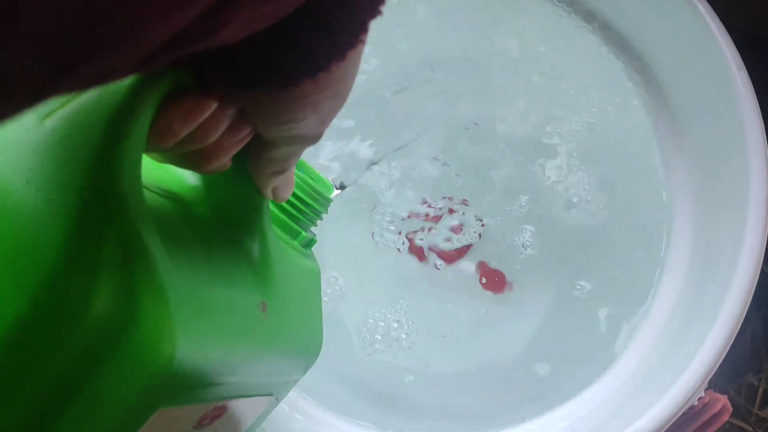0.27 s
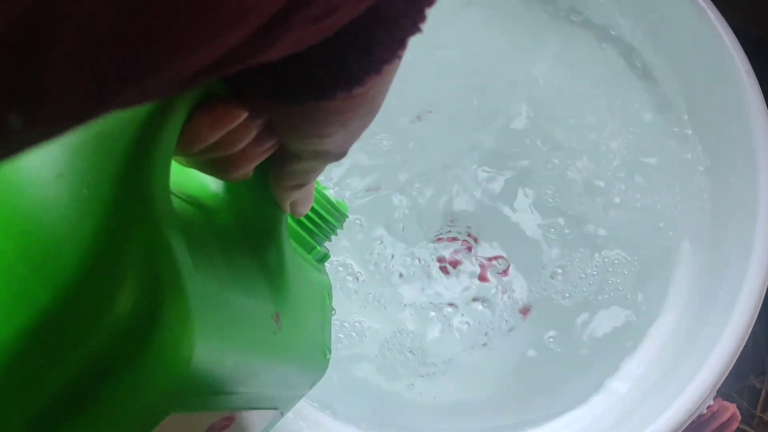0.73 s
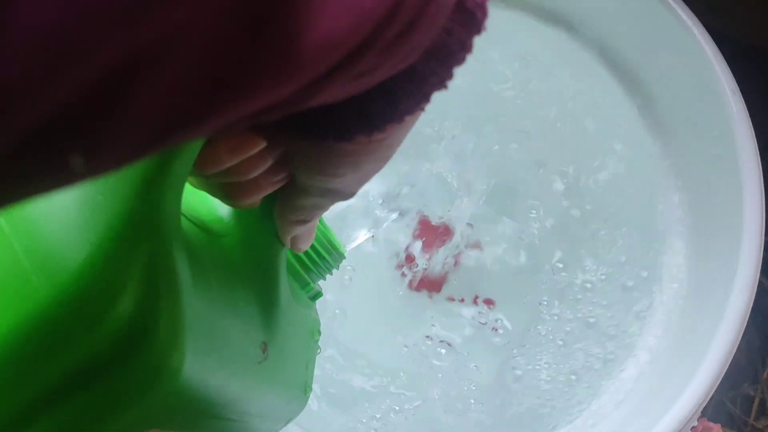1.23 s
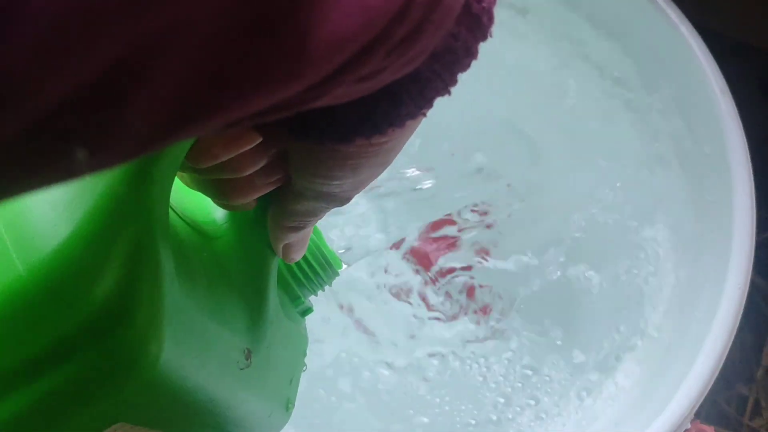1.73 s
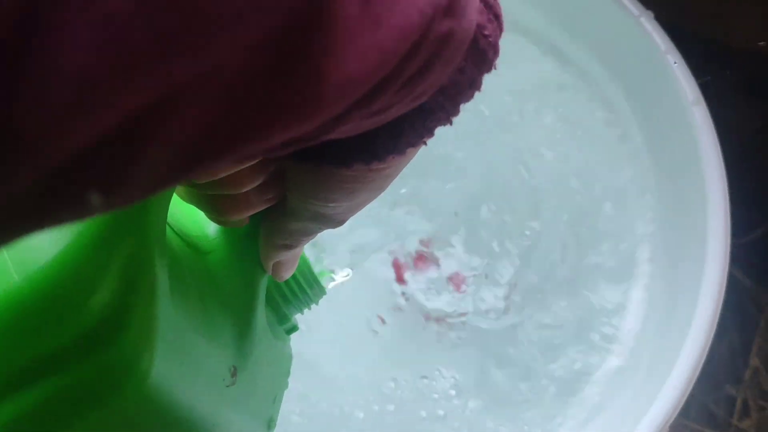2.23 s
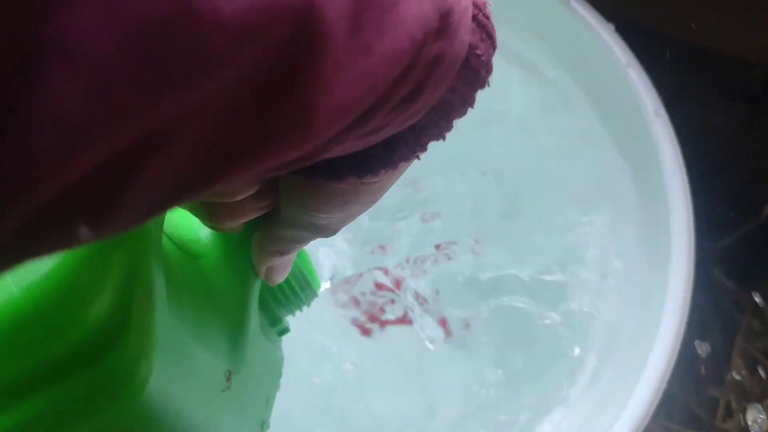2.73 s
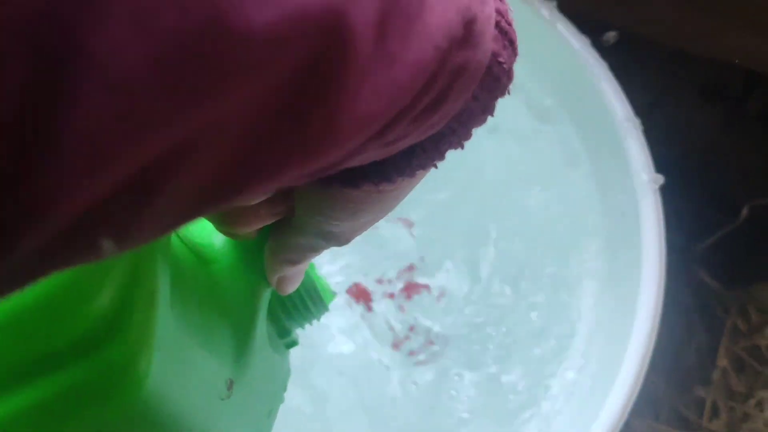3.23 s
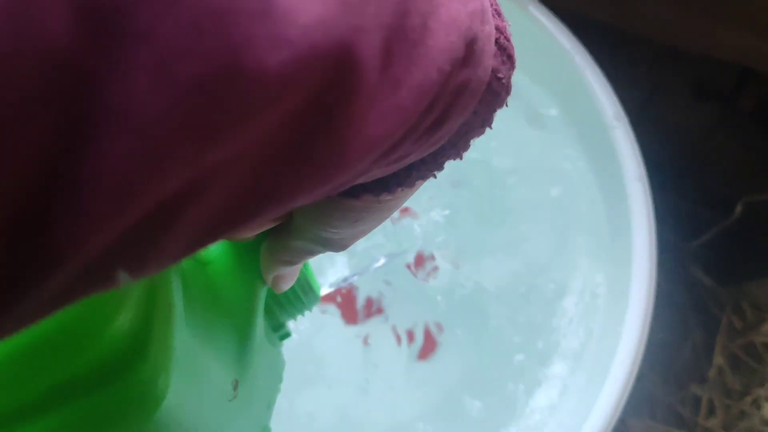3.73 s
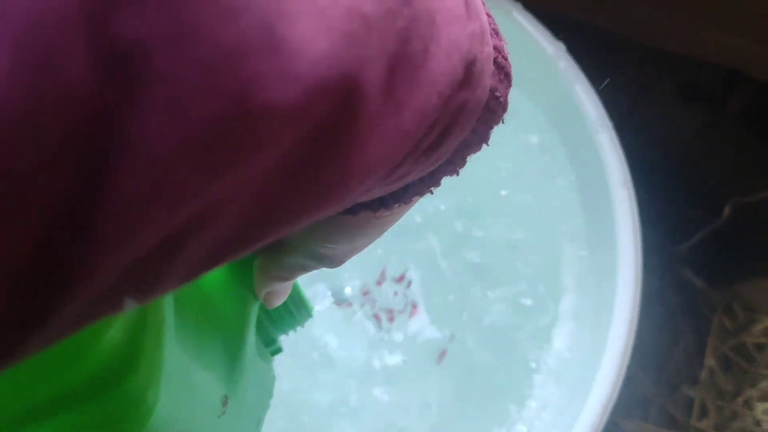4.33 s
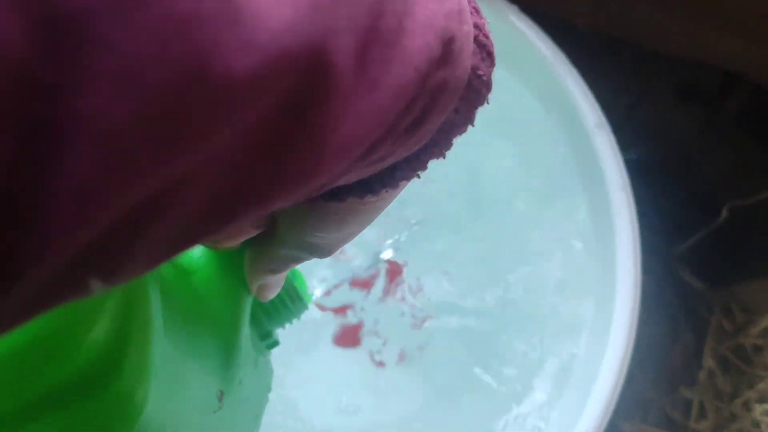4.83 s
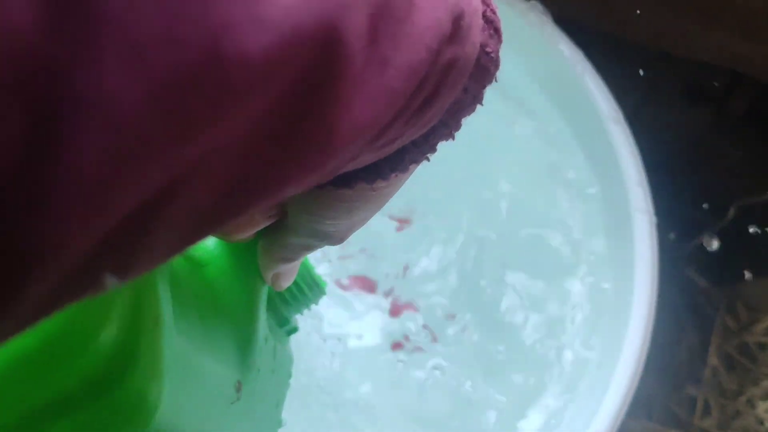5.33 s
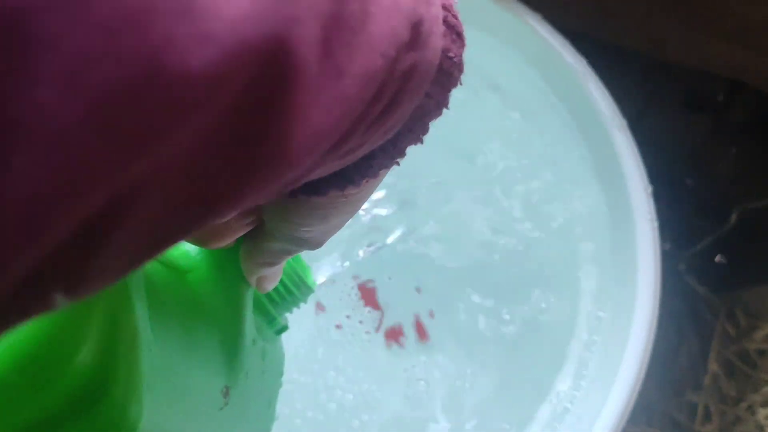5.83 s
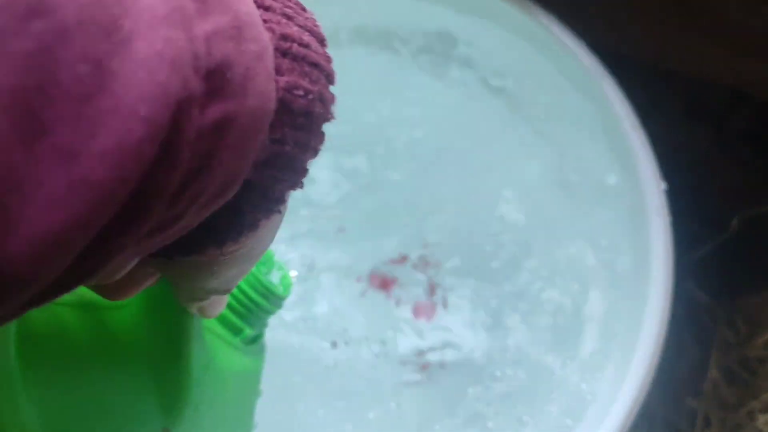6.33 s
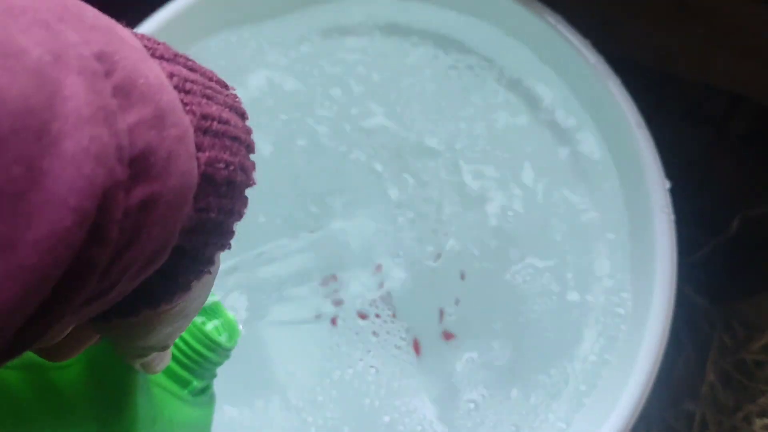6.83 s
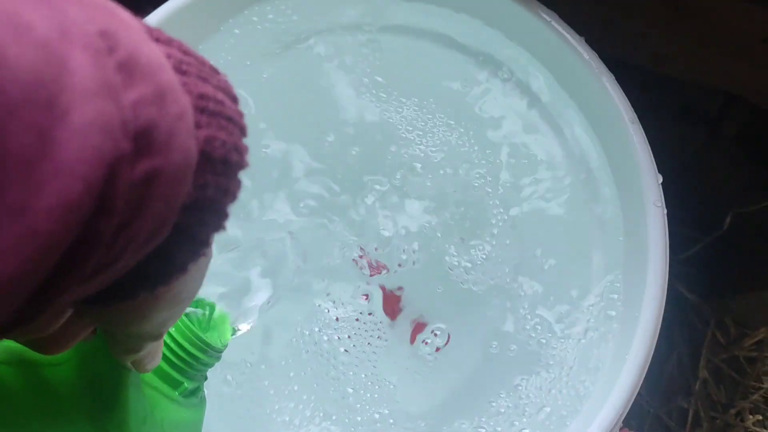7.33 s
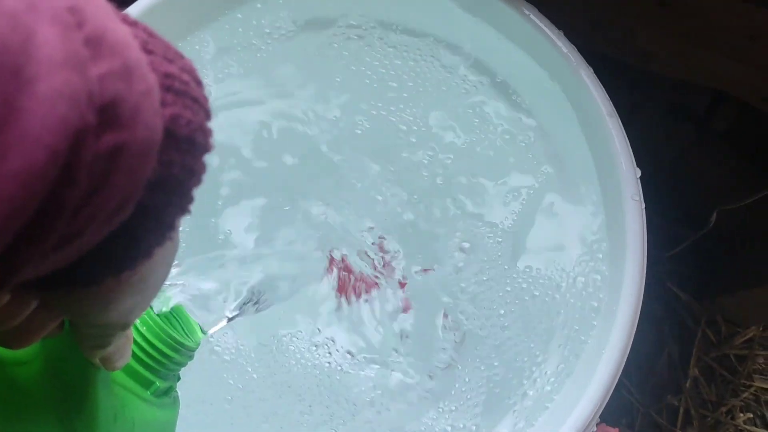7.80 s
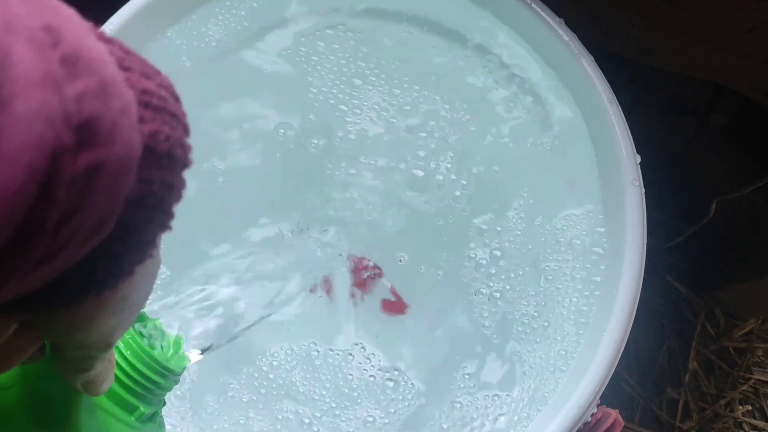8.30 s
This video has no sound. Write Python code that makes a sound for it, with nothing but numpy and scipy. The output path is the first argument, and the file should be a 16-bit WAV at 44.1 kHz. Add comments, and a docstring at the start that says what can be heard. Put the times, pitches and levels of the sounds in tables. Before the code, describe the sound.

Water glugs out of a hollow plastic jug in uneven slugs, splashing and bubbling into a nearly full plastic tub, close by outdoors.

```python
"""Water pours from a plastic jug into a wide, nearly full plastic tub, outdoors and close by.
From the start air gulps back about three times a second (sinking damped sines), so water lands in slugs:
noise bursts slap, clusters of short sines bubble, ringing ticks spray. From 2 s single bubbles plop.
From 5.9 s soft low thuds join in, from 6.5 s a burble of ringing pockets; the stream thins, the gulps
die out by about 7.3 s and plops remain. A faint filtered-noise rumble of open air runs throughout."""
import sys
import numpy as np
from scipy import signal
from scipy.fft import rfft, irfft
from scipy.io import wavfile
from scipy.ndimage import uniform_filter1d

SR = 44100
rng = np.random.default_rng(int(sys.argv[2]) if len(sys.argv) > 2 else 0)


def dump(signal):
    """Clip the signal to [-1, 1] and save it as 16-bit WAV at the path in sys.argv[1]."""
    limited = np.clip(np.atleast_2d(signal).T, -1, 1)
    pcm = np.round(limited * 32767).astype(np.int16)
    wavfile.write(sys.argv[1], SR, pcm)


N = 377496
TIME = np.arange(N) / SR

# Colour of the open air. Each row: frequency in Hz, relative density in dB per Hz.
AIR_COLOUR = [(20, 12.5), (60, 4.5), (400, -12.5), (8000, -22)]
# Soft low thuds as air slips into the jug; the stream chokes too. Each entry: time in seconds.
THUDS_S = [5.935, 6.408, 6.642, 6.855, 7.079, 7.311, 7.513, 7.757, 8.202, 8.368]
# Resonances of the jug's air and walls. Each row: frequency in Hz, level in dB, T60 in seconds.
JUG_MODES = [(221.9, -53, 0.19), (413, -53, 0.11), (588, -56.5, 0.33)]
# Gulps of air breaking into the jug. Each row: start in seconds, pitch in Hz, relative level in dB.
GULPS = [(0.05, 258, -21), (0.135, 300, -39), (0.196, 368, -32), (0.431, 252, -26), (0.552, 261, -29),
         (0.846, 360, -22.5), (0.921, 453, -25.5), (1.165, 346, -25.5), (1.221, 287, -27),
         (1.521, 246, -19), (1.637, 500, -20.5), (1.876, 267, -17), (1.929, 520, -26), (1.983, 180, -41),
         (2.227, 240, -28.5), (2.274, 397, -26), (2.34, 426, -29), (2.577, 270, -31), (2.678, 470, -24.5),
         (2.886, 280, -18.5), (3.024, 302, -31.5), (3.284, 316, -25.5), (3.366, 350, -26.5),
         (3.624, 440, -28), (3.711, 230, -36), (3.93, 290, -26.5), (4.631, 362, -31), (4.797, 330, -27),
         (5.511, 425, -16), (5.72, 293, -28.5), (6.273, 413, -25.5), (7.305, 248, -37)]
# Hums of the air in the jug. Each row: start in seconds, relative level in dB, T60 in seconds.
HUMS_IN_JUG = [(0.066, -18, 0.049), (0.452, -20, 0.041), (0.944, -30, 0.27), (1.54, -16.5, 0.036),
               (1.896, -16.5, 0.049), (2.242, -25, 0.051), (2.902, -28.5, 0.053), (3.384, -33, 0.11),
               (4.077, -31, 0.077), (4.82, -25, 0.064), (5.136, -41.5, 0.1)]
# Single large bubbles in the tub. Each row: start in seconds, pitch in Hz, relative level in dB.
LARGE_BUBBLES = [(1.95, 1040, -29.5), (2.282, 1260, -32), (2.849, 1044, -30.5), (3.182, 990, -31),
                 (3.612, 635, -27.5), (4.117, 2040, -33), (4.794, 910, -25), (5.613, 1347, -32),
                 (6.633, 540, -36), (6.646, 1170, -33.5), (6.69, 541, -31.5), (6.713, 1800, -31.5),
                 (6.803, 636, -35.5), (7.012, 683, -39), (7.155, 399, -34), (7.408, 585, -41.5),
                 (7.628, 623, -38.5), (7.815, 1080, -37.5), (8.085, 470, -33), (8.25, 690, -34.5)]
# Single fast drops snapping on the surface. Each row: start in seconds, relative level in dB.
FAST_DROPS = [(0.088, -21), (0.4355, -18.5), (3.2385, -19), (4.115, -25.5), (4.3, -23), (5.0695, -23.5),
              (5.462, -24.5), (6.012, -25.5), (6.812, -27.5), (7.1525, -20.5), (7.5605, -20)]
# Slugs hitting the surface. Each row: time in seconds, crack and body, both as relative level in dB.
SLUGS = [(0.3192, -26, -38), (0.432, -18, -19.5), (0.7635, -15, -19.5), (0.819, -26, -51),
         (1.169, -22, -37), (1.2848, -26, -29), (1.486, -16, -25.5), (1.5215, -24, -19),
         (1.877, -18.5, -32.5), (2.2278, -17.5, -26), (2.5302, -19.5, -23), (2.5731, -17.5, -22),
         (2.8501, -18, -26.5), (2.888, -16.5, -52), (3.1123, -52, -27.5), (3.237, -18.5, -24.5),
         (3.4503, -28, -24.5), (3.9195, -18, -26), (4.353, -28, -27), (4.574, -48, -28.5),
         (4.657, -26, -24.5), (5.0003, -21.5, -23), (5.2355, -24, -31.5), (5.7194, -21, -32.5),
         (6.0524, -17.5, -29), (6.27, -23.5, -35.5), (6.3872, -16, -61), (7.303, -34, -37.5),
         (8.182, -33.5, -29)]
# Colour of slap bodies. Each row: frequency in Hz, relative density in dB per Hz.
BODY_COLOUR = [(250, -2), (600, 11), (1500, 10.5), (2200, 16), (3000, 12), (5000, -13.5)]
# Colour of spray, cracks and snaps. Each row: frequency in Hz, relative density in dB per Hz.
SPRAY_COLOUR = [(1800, -15.5), (3000, -6.5), (4300, 0.5), (8000, 4), (10000, -2.5), (12000, -6),
                (14500, -3.5)]
# Colour of the bubbling. Each row: frequency in Hz, relative density in dB per Hz.
BUBBLING_COLOUR = [(350, -3.5), (700, -7), (1040, -1.5), (1450, -6), (2100, 0.5), (3000, -2.5), (4500, -8)]
# Unbroken part of the stream, thinning as the jug empties. Each row: time in seconds, level in dB.
STREAM_LEVEL = [(0.0, -39.5), (2.0, -36.5), (4.5, -37), (6.3, -38.5), (7.3, -44), (8.56, -42.5)]
# Chokes while air forces its way into the neck. Each entry: time in seconds.
CHOKES_S = [0.375, 0.659, 0.745, 1.12, 1.439, 2.135, 2.475, 2.815, 3.165, 3.565, 3.8, 4.235, 4.56, 4.945,
            5.57, 5.995, 6.24, 7.95]
# Gushes that tumble out and splash. Each row: start in seconds, hold in seconds, level in dB.
GUSH_EVENTS = [(0.03, 0.041, -34.5), (0.127, 0.064, -31), (0.388, 0.048, -32.5), (0.531, 0.03, -27.5),
               (0.802, 0.027, -22), (0.84, 0.17, -37.5), (1.153, 0.057, -29), (1.515, 0.038, -30.5),
               (1.631, 0.021, -33), (1.899, 0.083, -35.5), (2.141, 0.068, -32.5), (2.667, 0.0063, -26),
               (2.751, 0.0057, -28.5), (3.571, 0.049, -31), (3.683, 0.022, -29), (3.81, 0.025, -35.5),
               (3.977, 0.0081, -33), (4.025, 0.025, -31.5), (4.254, 0.025, -28), (4.999, 0.039, -32),
               (5.107, 0.03, -37.5), (5.323, 0.089, -36.5), (5.709, 0.089, -37.5), (6.364, 0.16, -38),
               (6.923, 0.087, -38), (7.135, 0.04, -38.5), (7.61, 0.041, -35), (7.79, 0.049, -30.5),
               (8.01, 0.097, -38.5), (8.282, 0.058, -37)]

CUTOFF_HZ, SPOT_COUNT = 14200, 8
TUB_T60_S, TUB_ECHO_DB = 0.079, 5
GULP_SUSTAIN = 1.81  # decay exponent: 1 rings freely, more holds before dying, as the flow feeds it
HUM_HZ, HUM_SAG_PER_S = 231.6, 1.5  # sag as a share of the starting pitch
GURGLE_DB, GURGLE_T60_S = -25, 0.33
NECK_OPEN_S = 6.47  # from here the neck is partly open and burbles
PLOP_S, PLOP_TAIL_T60_S, PLOP_TAIL_DB, PLOP_RISE_SHARE = 0.013, 0.079, -1.5, 0.18
SLAP_ATTACK_S, SLAP_T60_S, SPATTER_T60_S, SPATTER_DB = 0.0027, 0.013, 0.31, -27.5
SURFACE_ECHO_DB = -3  # added to the tub's echo for slaps and snaps
BUBBLE_RISE_SHARE = .13
CHOKE_DEPTH_DB, CHOKE_S, RECOVER_S = 5.5, 0.053, 0.016
GUSH_ATTACK_S, GUSH_T60_S = 0.0066, 0.085


def from_db(db):
    """Decibels to amplitude."""
    return 10 ** (np.asarray(db) / 20)


def rms_one(x):
    """Scale to an RMS of 1."""
    return x / np.sqrt(np.mean(x ** 2) + 1e-20)


def add(out, s, sound):
    """Mix a short sound in at time s."""
    i = int(np.clip(s * SR, 0, N - 1))
    out[i:i + len(sound)] += sound[:N - i]


def cut(x, hz, kind):
    """Second-order low- or high-pass."""
    return signal.sosfilt(signal.butter(2, hz, kind, fs=SR, output="sos"), x + 1e-18)


def colour(x, spectrum, size=1024):
    """Minimum-phase filter of unit power; beyond the listed points it falls 12 dB an octave."""
    log_hz, db = np.log2(np.array(spectrum)[:, 0]), np.array(spectrum)[:, 1]
    grid = np.log2(np.maximum(np.arange(size + 1), .5) * SR / (2 * size))
    octaves_outside = np.abs(grid - np.clip(grid, log_hz[0], log_hz[-1]))
    gain = rms_one(from_db(np.interp(grid, log_hz, db) - 12 * octaves_outside))
    # folding the cepstrum to positive times makes the response causal
    cepstrum = irfft(np.log(gain))[:size] * np.where(np.arange(size) > 0, 2, 1)
    response = irfft(np.exp(rfft(cepstrum, 2 * size)))
    return signal.oaconvolve(x, response[None], axes=1)[:, :N]


def steady(x, window_s):
    """Even out the slow level, leaving the grain."""
    power = uniform_filter1d(np.mean(x ** 2, axis=0), int(window_s * SR) + 1)
    smooth_power = uniform_filter1d(np.abs(power), int(window_s * SR / 2) + 1)
    return x / np.sqrt(smooth_power.clip(1e-12))


def ring(x, hz, t60_s):
    """A resonance: a unit click leaves a damped cosine of height 1."""
    r = from_db(-60 / (t60_s * SR))
    w = 2 * np.pi * min(hz, .45 * SR) / SR
    return signal.lfilter([1, -r * np.cos(w)], [1, -2 * r * np.cos(w), r * r], x + 1e-18)


def bubble(hz, t60_s, glide_share, attack_per_cycle=5.6, sustain=1):
    """A damped sine whose pitch shifts by glide_share while it dies."""
    t = TIME[:int(t60_s * SR) + 2]
    swell = 1 - np.exp(-attack_per_cycle * hz * t)
    decay = from_db(-60 * (t / t60_s) ** sustain)
    return swell * decay * np.sin(2 * np.pi * hz * t * (1 + glide_share * t / (2 * t60_s)))


def tub(spots, spread_db=6.5, lag_s=0.00024, scatter_hz=520, echo_db=0, samples=9000):
    """Each surface spot reaches two microphones by its own path and its own echoes off the wall."""
    t, out = TIME[:samples], 0
    for place, sound in zip(np.linspace(-1, 1, len(spots)), spots):
        echoes = rng.standard_normal((2, samples)) * from_db(-60 * t / TUB_T60_S) * (t > .001)
        echoes = cut(rms_one(echoes) / np.sqrt(samples), scatter_hz, "high")
        paths = from_db(TUB_ECHO_DB + echo_db) * echoes
        lag = int(abs(place) * lag_s * SR)
        direct = from_db(spread_db * place * np.array([.5, -.5]))
        paths[[0, 1], [lag * (place < 0), lag * (place > 0)]] += direct
        out = out + signal.oaconvolve(sound[None], paths, axes=1)[:, :N]
    return out


def outdoor_air(level_db=-56.0, apart_db=-3.5):
    """A faint noise rumble, mostly alike at both microphones."""
    mid, side = rng.standard_normal((2, N))
    both = mid + from_db(apart_db) * side * [[1], [-1]]
    return from_db(level_db) * colour(both, AIR_COLOUR, size=4096)


def thuds(level_db=-36.5, low_hz=50, high_hz=230, spread_s=0.05, cycles=4, pockets=9):
    """Each dull thud is a quick tumble of large air pockets in the jug, each only a few swings long."""
    out = np.zeros(N)
    for s in THUDS_S:
        for wait, pitch in rng.random((pockets, 2)):
            hz = low_hz * (high_hz / low_hz) ** pitch
            pocket = bubble(hz, cycles / hz, glide_share=0)
            add(out, s - .01 + spread_s * wait, from_db(level_db) * pocket)
    return out


def jug(x):
    """The hollow jug rings on after whatever stirs it."""
    return x + sum(from_db(db) * ring(x, hz, t60_s) for hz, db, t60_s in JUG_MODES)


def churn(per_s, cycles, low_hz, high_hz, glide_share):
    """Large air pockets tumble through the water, each ringing briefly at its own pitch; RMS 1."""
    out = np.zeros(N)
    for when, pitch, size in rng.random((int(per_s * N / SR), 3)):
        hz = low_hz * (high_hz / low_hz) ** pitch
        add(out, when * N / SR, size * bubble(hz, cycles / hz, glide_share))
    return rms_one(out)


def stirring():
    """Strength of the gurgle: each gulp stirs the jug's water, a louder one somewhat more; it settles."""
    power = np.zeros(N)
    for s, _, db in GULPS:
        add(power, s, from_db(GURGLE_DB + db / 2 - 60 * TIME[:SR] / GURGLE_T60_S) ** 2)
    return np.sqrt(power)


def gulps(gulp_cycles=9, glide_share=-0.3):
    """A gulp swings a few times, sinking in pitch; the jug's air hums and sags as it dies."""
    out = np.zeros(N)
    for s, hz, db in GULPS:
        add(out, s, from_db(db) * bubble(hz, gulp_cycles / hz, glide_share, sustain=GULP_SUSTAIN))
    for s, db, t60_s in HUMS_IN_JUG:
        hum = bubble(HUM_HZ, t60_s, -HUM_SAG_PER_S * t60_s, attack_per_cycle=0.51, sustain=GULP_SUSTAIN)
        add(out, s, from_db(db) * hum)
    return out


def plops(level_db=0.0, attack_per_cycle=1.6, echo_db=-3, wobble_depth=0.43, samples=4000):
    """Large bubbles pinch off under the jug's mouth; each note wobbles in level and swoops up as it rises."""
    spots, t = np.zeros((SPOT_COUNT, N)), TIME[:samples]
    shape = from_db(-60 * (t / PLOP_S) ** 3) + from_db(PLOP_TAIL_DB - 60 * t / PLOP_TAIL_T60_S)
    for k, (s, hz, db) in enumerate(LARGE_BUBBLES):
        pitch_hz = hz * (1 + PLOP_RISE_SHARE * rng.random() * (np.tanh(t / PLOP_S) - .5))
        wobble = 1 + wobble_depth * rms_one(cut(rng.standard_normal(samples), hz / 2, "low"))
        swell = 1 - np.exp(-attack_per_cycle * hz * t)
        note = swell * wobble * np.sin(2 * np.pi * np.cumsum(pitch_hz) / SR)
        add(spots[k % SPOT_COUNT], s, from_db(db + level_db) * shape * note)
    return tub(jug(spots), spread_db=-2.5, lag_s=.0001, echo_db=echo_db)


def snaps(level_db=18.5, t60_s=0.006, samples=600):
    """A fast drop hits the open surface with one short bright crack of noise."""
    spots = np.zeros((SPOT_COUNT, N))
    decay = from_db(-60 * TIME[:samples] / t60_s)
    for k, (s, db) in enumerate(FAST_DROPS):
        crack = rms_one(rng.standard_normal(samples) * decay) / np.sqrt(samples)
        add(spots[k % SPOT_COUNT], s, from_db(db + level_db) * crack)
    return tub(colour(spots, SPRAY_COLOUR), lag_s=0, echo_db=SURFACE_ECHO_DB)


def slaps(crack_db=18.5, body_db=22.5, grain_db=3.5, samples=4000):
    """A noise burst builds as the slug sinks in, dies fast and leaves quieter, ragged spatter."""
    cracks, bodies = np.zeros((2, SPOT_COUNT, N))
    t = TIME[:samples]
    after = np.maximum(t - SLAP_ATTACK_S, 0)
    decay = from_db(-60 * after / SLAP_T60_S) + from_db(SPATTER_DB - 60 * after / SPATTER_T60_S)
    shape = np.minimum(t / SLAP_ATTACK_S, 1) ** 2 * decay
    for k, (s, crack, body) in enumerate(SLUGS):
        noise, ragged = rng.standard_normal((2, samples))
        burst = rms_one(noise * from_db(grain_db * ragged) * shape) / np.sqrt(samples)
        start_s = s - SLAP_ATTACK_S / 2
        add(cracks[k % SPOT_COUNT], start_s, from_db(crack + crack_db) * burst)
        add(bodies[k % SPOT_COUNT], start_s, from_db(body + body_db) * burst)
    slap = colour(cracks, SPRAY_COLOUR) + colour(bodies, BODY_COLOUR)
    # slugs land near the middle, so arrival times at the two sides differ little
    return tub(slap, lag_s=.00005, echo_db=SURFACE_ECHO_DB)


def spray(drops_per_s=680, size_db=5.0, burst_t60_s=0.0099, tick_t60_s=0.0018,
          low_hz=2200, high_hz=12500, samples=900):
    """Each falling drop bursts into a few milliseconds of tiny ticks ringing at its own pitch."""
    spots = np.zeros((SPOT_COUNT, N))
    burst = from_db(-60 * TIME[:samples] / burst_t60_s)
    for when, size, pitch, spot in rng.random((int(drops_per_s * N / SR), 4)):
        hz = low_hz + pitch * (high_hz - low_hz)
        ticks = ring(burst * rng.laplace(size=samples), hz, tick_t60_s)
        strength = from_db(-size_db * np.log(0.0061 + size))  # few drops are strong
        add(spots[int(spot * SPOT_COUNT)], when * N / SR, strength * ticks)
    return steady(colour(tub(spots), SPRAY_COLOUR), window_s=0.056)


def bubbling(clusters_per_s=170, size_db=4.2, cycles=20, low_hz=520, high_hz=5200,
             spread_s=.025, climb_per_s=6, bubbles=6):
    """Air dragged under breaks into quick, loosely climbing runs of bubbles; most rise, a few sag."""
    spots = np.zeros((SPOT_COUNT, N))
    for when, size, pitch, spot in rng.random((int(clusters_per_s * N / SR), 4)):
        centre_hz = low_hz * (high_hz / low_hz) ** (pitch ** .6)
        strength = from_db(-size_db * np.log(0.02 + size)) * np.sqrt(centre_hz / low_hz)
        for wait, life, detune in rng.random((bubbles, 3)):
            climb = 1 + climb_per_s * spread_s * (wait - .5)
            hz = centre_hz * climb * 2 ** ((detune - .5) / 2)
            note = bubble(hz, cycles * (.5 + life) / hz, BUBBLE_RISE_SHARE * (2 * life - .5))
            add(spots[int(spot * SPOT_COUNT)], when * N / SR + spread_s * wait, strength * note)
    return steady(colour(tub(spots), BUBBLING_COLOUR), window_s=0.024)


def lumps(per_s=32, t60_s=0.018, height=2.85, rise_s=0.0018):
    """The stream breaks into lumps; each swells the bubbling and spray at once and dies away. Power 1."""
    arrivals = (rng.random(N) < per_s / SR) * rng.random(N)
    lift = signal.lfilter([height], [1, -from_db(-60 / (t60_s * SR))], arrivals + 1e-18)
    return steady(1 + uniform_filter1d(lift, int(rise_s * SR) + 1)[None], window_s=0.096)


def stream():
    """Strength of landing water: thins towards each choke, springs back; gushes swell, hold and die."""
    db = np.interp(TIME, *np.transpose(STREAM_LEVEL))
    for s in CHOKES_S + THUDS_S:
        distance = np.abs(TIME - s) / np.where(TIME < s, CHOKE_S, RECOVER_S)
        db -= CHOKE_DEPTH_DB * np.exp(-np.minimum(distance, 10) ** 2)
    power = from_db(db) ** 2
    for s, hold_s, level_db in GUSH_EVENTS:
        t = TIME[:int((hold_s + GUSH_T60_S) * SR)]
        decay = from_db(level_db - 60 * np.maximum(t - hold_s, 0) / GUSH_T60_S)
        gush = np.minimum(t / GUSH_ATTACK_S, 1) * decay
        add(power, s, gush ** 2)
    return np.sqrt(power)


def scene(bubbling_db=-1.0, spray_db=0.8, churn_db=-16.5, burble_db=-15):
    """Splash in the tub, gulping jug above it, open air; once the neck opens, burbling joins in."""
    flow = stream()
    neck_open = np.clip((TIME - NECK_OPEN_S) / .5, 0, 1)
    splash = flow * lumps() * (from_db(bubbling_db) * bubbling() + from_db(spray_db) * spray())
    splash = splash + slaps() + snaps()
    gurgle_strength = stirring() + from_db(churn_db) * flow
    gurgle = gurgle_strength * churn(per_s=520, cycles=10.9, low_hz=159, high_hz=775, glide_share=0.027)
    burble_strength = from_db(burble_db) * neck_open * flow
    burble = burble_strength * churn(per_s=55, cycles=33, low_hz=455, high_hz=980, glide_share=0.061)
    hollow = jug(gulps() + gurgle + burble)
    gulping = tub(hollow[None], spread_db=0, lag_s=0, echo_db=-6)
    return splash + plops() + gulping + thuds() + outdoor_air()


def record(dry, left_dull_share=0.43, dull_hz=7000):
    """The left microphone is a little duller; the top is cut steeply."""
    soft = signal.lfilter(*signal.butter(1, dull_hz, fs=SR), dry[0])
    heard = np.array([dry[0] + left_dull_share * (soft - dry[0]), dry[1]])
    return signal.sosfilt(signal.ellip(10, .2, 80, CUTOFF_HZ, fs=SR, output="sos"), heard)


dry = scene()
out = record(dry)
dump(out)
```